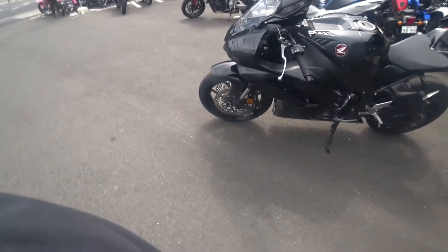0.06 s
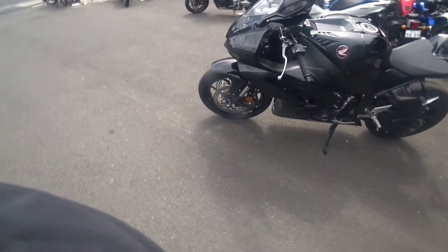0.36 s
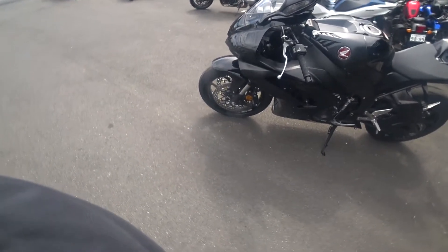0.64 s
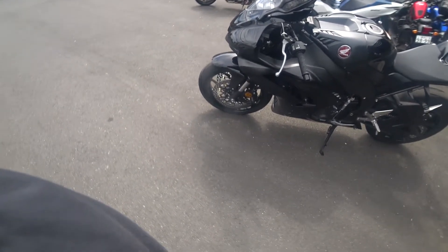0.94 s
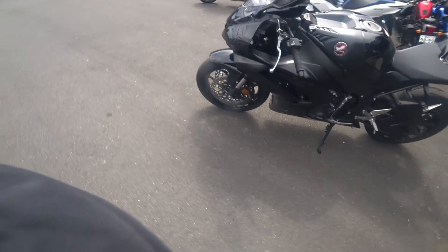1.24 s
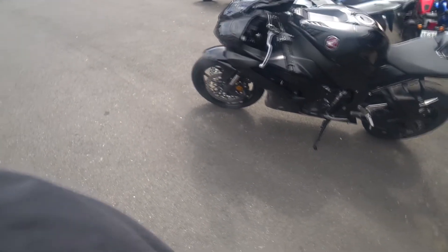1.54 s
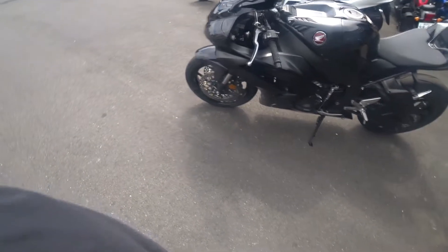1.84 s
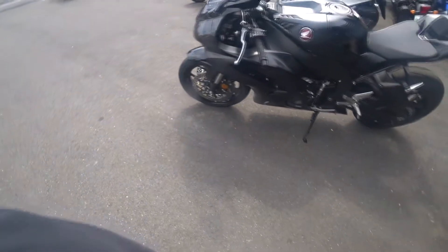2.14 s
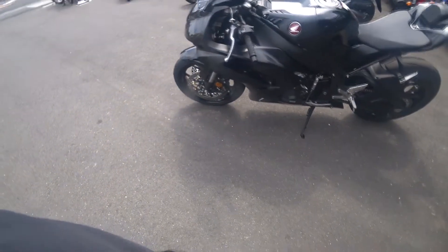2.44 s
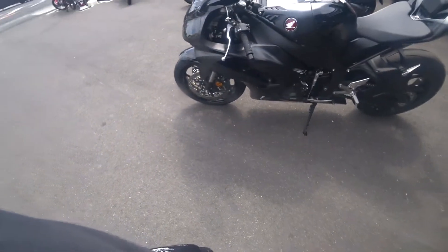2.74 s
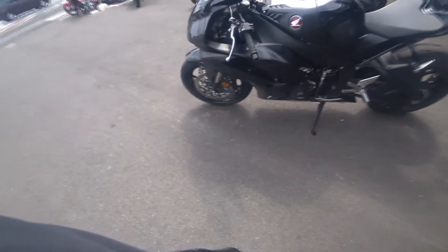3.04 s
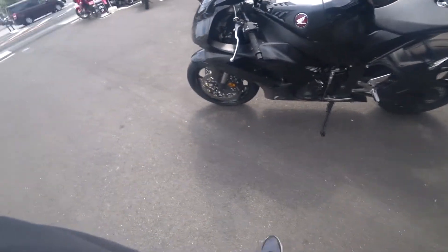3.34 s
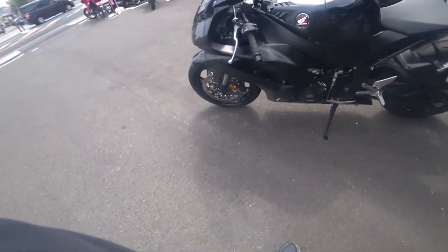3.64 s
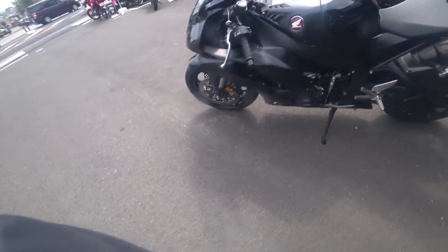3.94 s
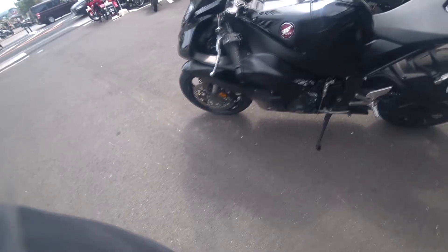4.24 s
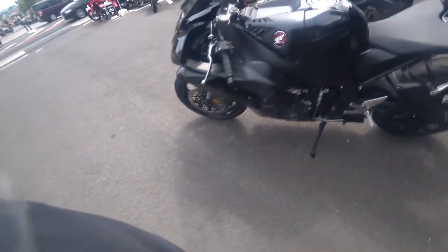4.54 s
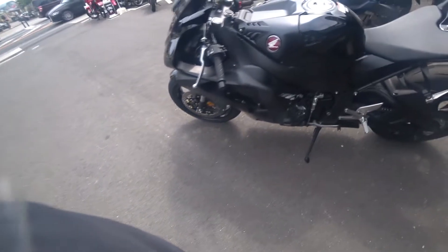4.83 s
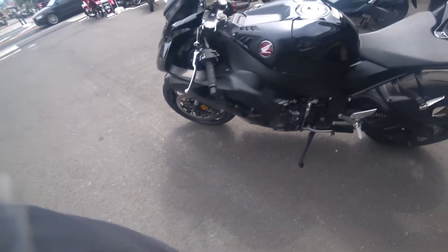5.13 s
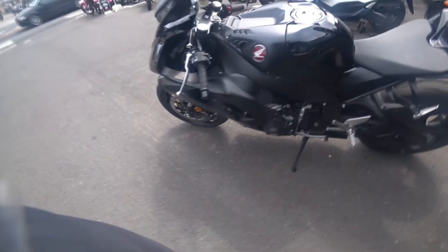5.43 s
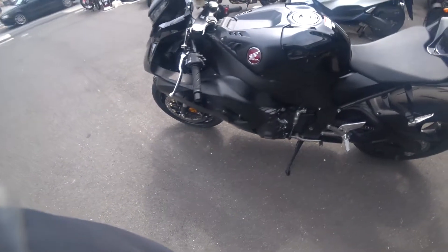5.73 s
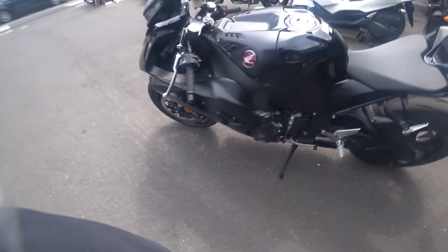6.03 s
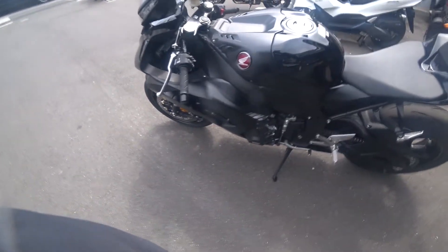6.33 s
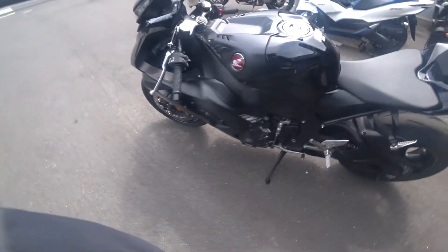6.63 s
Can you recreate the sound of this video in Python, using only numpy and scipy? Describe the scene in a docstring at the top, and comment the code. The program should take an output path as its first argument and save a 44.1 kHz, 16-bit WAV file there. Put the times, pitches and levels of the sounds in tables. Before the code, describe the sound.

A four-cylinder motorcycle idles close by in an open paved lot for the whole seven seconds or so. The main sound is a deep, booming exhaust drone with a fast, soft burble and breathy puffs of gas. A faint mechanical whirr with light valve ticking sits above it, and a steady low rumble lies beneath. The idle wavers very slightly, with the burble and whirr swelling a little at each small rise, but the engine never revs. The tailpipe adds brief, mild throaty growls at about 1.2, 2 and 3.7 seconds, the last one weaker. A very soft high hiss is present from the start until about 1.7 seconds, and returns in short, faint wisps near 3.2 and 5 seconds. The sound is dry and stays at nearly the same loudness to the end.

```python
"""An open paved lot: a four-cylinder motorcycle idles close by, its speed hunting a little.
The silencer booms on the first three firing orders; each exhaust pulse adds a burble and a puff of gas.
When the engine picks up, the main boom thins while burble, gas and mechanical whirr swell.
A low rumble lies underneath, a few soft hisses pass, and now and then the tailpipe growls."""
import sys
import numpy as np
from scipy import signal
from scipy.fft import rfft, irfft, next_fast_len
from scipy.io import wavfile

SR = 44100
rng = np.random.default_rng(int(sys.argv[2]) if len(sys.argv) > 2 else 0)


def master_out(mix):
    """Clip the mix to full scale and print it as 16-bit PCM to the path in sys.argv[1]."""
    frames = np.transpose(np.atleast_2d(mix))
    ceiling = np.clip(frames, -1, 1)
    pcm = np.round(ceiling * 32767).astype(np.int16)
    wavfile.write(sys.argv[1], SR, pcm)


N = 303408

# The pulse strength of each of the four cylinders in dB, in firing order.
CYLINDER_DB = [0.97, -1.1, 0.34, -0.55]


def from_db(db):
    """Decibels to gain."""
    return 10 ** (np.asarray(db) / 20)


def rms_one(x):
    """Scale to unit power."""
    return x / np.sqrt(np.mean(x ** 2) + 1e-20)


def in_time(rows):
    """An automation curve: (seconds, value) points joined by straight lines."""
    return np.interp(np.arange(N) / SR, *np.transpose(rows))


def drift(rate_hz):
    """A smooth random wobble of unit power, rolling off above `rate_hz`."""
    hz = np.arange(N // 2 + 1) * SR / N
    return rms_one(irfft(rfft(rng.standard_normal(N)) / (1 + (hz / rate_hz) ** 4), N))


def colour(x, points):
    """Minimum-phase EQ through (Hz, dB) points, falling steeply past its ends; unit power out."""
    size = next_fast_len(N + SR // 2)
    size += size % 2
    octave = np.log2(np.maximum(np.arange(size // 2 + 1) * SR / size, 1))
    hz, db = np.transpose(points)
    octaves_outside = np.abs(octave - np.clip(octave, np.log2(hz[0]), np.log2(hz[-1])))
    gain = from_db(np.interp(octave, np.log2(hz), db) - 30 * np.minimum(octaves_outside, 2))
    # Folding the cepstrum onto positive time makes the filter causal.
    cepstrum = irfft(np.log(gain))
    cepstrum[1:size // 2] *= 2
    cepstrum[size // 2 + 1:] = 0
    return rms_one(irfft(rfft(x, size) * np.exp(rfft(cepstrum)))[:N])


def level(curve, surge, swell_db):
    """A layer's fader: its dB curve, raised by `swell_db` for each firing per second above idle."""
    return from_db(in_time(curve) + swell_db * surge)


def gate(start, attack_s, hold_s, release_s):
    """Rises to 1 by `start`, holds, then falls."""
    return np.interp(np.arange(N) / SR - start, [-attack_s, 0, hold_s, hold_s + release_s], [0, 1, 1, 0])


def passings(count):
    """Samples at which a running count reaches the next whole number."""
    return np.flatnonzero(np.diff(np.floor(count)) > 0)


def engine_tones(firing, orders, waver_db, waver_hz):
    """Sines locked to multiples of the firing rate, each wavering in level on its own."""
    tones = [from_db(db + waver_db * drift(waver_hz)) * np.cos(2 * np.pi * (k * firing + rng.random()))
             for k, db in orders]
    return np.sqrt(2) * sum(tones)


def boom(firing, surge, flutter_db, trade_db, putter):
    """Three clean orders from the silencer, the third inverted above its resonance."""
    # How the silencer answers to speed. Each row: firings per second above idle,
    # second order in dB, third order in dB.
    silencer = [(-2.6, -14, -24.5), (-0.17, -14.5, -21), (-0.56, -15, -20.5), (1.7, -17.5, -20.5),
                (2, -20, -18)]
    # The deepest tone at idle speed. Each row: time in seconds, relative level in dB.
    fundamental = [(0.0, -21.6), (0.17, -24.8), (0.36, -21.8), (1.52, -22.7), (1.82, -24.3), (2.28, -22.3),
                   (2.47, -25.3), (4.84, -20.7), (4.94, -29.1), (5.07, -22.4), (5.61, -25.3), (6.5, -23.9),
                   (6.63, -26.5), (6.87, -23.8)]
    surges, *upper_db = np.transpose(silencer)
    first = from_db(-0.4) * level(fundamental, surge, swell_db=0.99)
    second, third = (from_db(np.interp(surge, surges, db)) for db in upper_db)
    trade = from_db(trade_db * drift(5.4))   # uneven burns trade strength between the first two
    tones = np.zeros(N)
    for k, gain in enumerate((first * trade, second / trade, -third), 1):
        tones += gain * from_db(flutter_db * drift(27)) * np.cos(2 * np.pi * k * firing)
    strong_weak = 1 + putter * np.cos(np.pi * firing)
    return np.sqrt(2) * tones * strong_weak


def lope(firing):
    """Unequal cylinders put weak tones between the firing orders, which beat against the boom."""
    # Each row: multiple of the firing rate, level in dB.
    between_orders = [(1.25, -42), (1.749, -44), (2.25, -33), (2.5, -37), (2.748, -46.5), (3.499, -45),
                      (4.5, -49)]
    return engine_tones(firing, between_orders, waver_db=1.5, waver_hz=3.0)


def burble(firing, rough_db, uneven_db):
    """Each exhaust pulse carries overtones and a gulp of turbulence as strong as its own burn."""
    # The pulses' overtones. Each row: multiple of the firing rate, level within the burble in dB.
    overtones = [(4, -8), (5, -7.5), (6, -10.5), (7, -11.5), (8, -12.5), (9, -17), (10, -19), (11, -16.5),
                 (12, -21.5), (13, -17), (17, -26)]
    # The gulps' low-mid body. Each row: frequency in Hz, relative level in dB.
    gulp_eq = [(185, -2), (215, -2.5), (255, 3.5), (295, 0.5), (340, -1.5), (400, -4), (470, -14.5)]
    tones = engine_tones(firing, overtones, waver_db=2.1, waver_hz=3.9)
    pulses = passings(firing)
    burn_db = np.resize(CYLINDER_DB, len(pulses)) + uneven_db * rng.standard_normal(len(pulses))
    strength = np.interp(np.arange(N), pulses, from_db(burn_db))
    gulps = colour(rng.standard_normal(N) * strength, gulp_eq)
    return tones + from_db(rough_db) * gulps


def puffs(firing, throb_db, crank_db, throat_db):
    """Gas noise swells with each firing and each crank turn; the tailpipe's resonance makes it throaty."""
    # The breathy midrange of the gas. Each row: frequency in Hz, relative level in dB.
    gas_eq = [(380, -6.5), (480, -3), (580, -3.5), (750, -3.5), (900, -6), (1350, -11), (1830, -14.5),
              (2050, -22), (2600, -29.5)]
    throat_hz, throat_width_hz = 548, 110
    swell_db = -throb_db * np.cos(2 * np.pi * firing) + crank_db * np.cos(np.pi * firing)
    gas = colour(rng.standard_normal(N) * from_db(swell_db), gas_eq)
    throat = signal.lfilter(*signal.iirpeak(throat_hz, throat_hz / throat_width_hz, fs=SR), gas)
    return gas + from_db(throat_db) * throat


def whirr(firing, throb_db, tick_db, tick_s, tick_spread_db):
    """Chain and gears rustle in step with the camshafts; valves tick as they seat, twice per firing."""
    # The machinery's bright sheen. Each row: frequency in Hz, relative level in dB.
    whirr_eq = [(1500, -9), (2100, -3.5), (2700, -2.5), (3000, -5), (3800, -6), (5300, -11), (6100, -14),
                (6550, -13.5), (7200, -17), (7900, -15.5), (8400, -17.5), (9000, -22.5), (10500, -29.5)]
    seatings = passings(2 * firing)
    impacts = np.zeros(N)
    impacts[seatings] = from_db(tick_db + tick_spread_db * rng.uniform(-1, 1, len(seatings)))
    ticks = signal.lfilter([1], [1, -np.exp(-1 / (tick_s * SR))], impacts + 1e-18)
    cam = np.cos(2 * np.pi * firing / len(CYLINDER_DB))
    rustle = from_db(-throb_db * np.cos(2 * np.pi * firing) + 0.39 * cam + .5 * drift(17))
    return colour(rng.standard_normal(N) * np.hypot(rustle, ticks), whirr_eq)


def ground_bounce(x, lag_s, bounce):
    """The bounce off the paving combs the sound; its lag shifts as the listener sways."""
    late = np.arange(N) - SR * lag_s * (1 + .05 * drift(.5))
    return x + bounce * np.interp(late, np.arange(N), x)


def rumble():
    """A steady bed of low noise."""
    # The bed's bass weight. Each row: frequency in Hz, relative level in dB.
    rumble_eq = [(8, -14.5), (22, -5.5), (33, -1.5), (45, -1), (60, -1.5), (72, -4.5), (98, 3.5),
                 (128, -6.5), (145, -10), (165, -10.5), (195, -17), (300, -24.5)]
    return colour(rng.standard_normal(N), rumble_eq)


def hisses():
    """Each soft hiss opens, sags or lifts slightly while it holds, and shuts."""
    # Each row: time fully open in seconds, attack, hold and release in seconds,
    # level in dB, sag in dB per second.
    cues = [(0.018, .05, 1.14, 0.13, -56, 4), (1.24, 0.13, 0.24, 0.22, -55, -1),
            (3.18, .04, .1, .05, -58.5, 10), (5.045, .01, .15, 0.051, -50.5, 34)]
    # The hiss's treble colour. Each row: frequency in Hz, relative level in dB.
    hiss_eq = [(1800, -19.5), (3000, 4), (5300, -1), (6500, -7), (9000, -17)]
    t = np.arange(N) / SR
    envelope = sum(gate(start, attack, hold, release) * from_db(db - sag * np.maximum(t - start, 0))
                   for start, attack, hold, release, db, sag in cues)
    return envelope * colour(rng.standard_normal(N), hiss_eq)


def growls(firing, order, ramp_s, wobble_rad, waver_db):
    """Now and then the tailpipe catches the overtone nearest its resonance and sings it roughly."""
    # Each row: start in seconds, hold in seconds, level against the gas noise in dB.
    cues = [(1.195, 0.2, -6), (1.97, .16, -5), (3.657, 0.36, -12)]
    envelope = sum(from_db(db) * gate(start, ramp_s, hold, ramp_s) for start, hold, db in cues)
    phase = 2 * np.pi * order * firing + wobble_rad * drift(30)
    return np.sqrt(2) * envelope * from_db(waver_db * drift(30)) * np.cos(phase)


def scene():
    """The crank drives every engine layer; rumble and hisses join them in a mono mix."""
    # The hunting idle. Each row: time in seconds, firings per second.
    speed = [(0.0, 53.5), (0.32, 52.0), (0.44, 53.3), (0.7, 52.1), (0.94, 52.8), (1.14, 52.0), (1.32, 53.0),
             (1.46, 51.1), (1.92, 52.2), (2.04, 53.8), (2.24, 50.8), (2.34, 52.3), (2.72, 50.6),
             (2.82, 51.9), (3.1, 51.9), (3.18, 52.7), (3.44, 51.2), (3.86, 52.8), (4.08, 52.7),
             (4.16, 50.9), (4.28, 51.6), (4.56, 50.0), (4.7, 52.7), (4.8, 51.0), (5.56, 51.5), (5.68, 50.5),
             (5.78, 52.5), (5.94, 50.2), (6.22, 51.1), (6.3, 53.4), (6.5, 51.1), (6.87, 50.3)]
    # The fader ride shared by burble and gas. Each row: time in seconds, relative level in dB.
    gas_ride = [(0, -38), (1.2, -39), (1.75, -37.5), (2.72, -39.5), (3.8, -38), (4.09, -38), (4.2, -40),
                (4.65, -40), (4.8, -40), (6.87, -39)]
    firing_hz, idle_hz = in_time(speed), 51.7
    surge = firing_hz - idle_hz
    firing = np.cumsum(firing_hz * (1 + .002 * drift(14))) / SR   # running count of firings

    burble_gain = from_db(4.0) * level(gas_ride, surge, swell_db=1.3)
    gas_gain = from_db(2.5) * level(gas_ride, surge, swell_db=0.84)
    whirr_gain = from_db(-51 + 1.1 * surge)

    exhaust = boom(firing, surge, flutter_db=0.25, trade_db=0.56, putter=.06) + lope(firing)
    exhaust += burble_gain * burble(firing, rough_db=-3.5, uneven_db=1.5)
    tailpipe = puffs(firing, throb_db=1.4, crank_db=0.48, throat_db=-17.5 + 3.3 * surge)
    tailpipe += growls(firing, order=11, ramp_s=.03, wobble_rad=1.1, waver_db=1)
    machinery = whirr(firing, throb_db=0.56, tick_db=-3.5, tick_s=.0012, tick_spread_db=6.5)
    bed = from_db(-29.5) * rumble()
    gas_and_whirr = ground_bounce(gas_gain * tailpipe + whirr_gain * machinery, lag_s=.0035, bounce=0.15)
    return (exhaust + gas_and_whirr + bed + hisses())[None]


def record(dry):
    """A steep low-pass takes off the top."""
    cutoff_hz = 10800
    return signal.sosfilt(signal.ellip(10, .1, 80, cutoff_hz, fs=SR, output="sos"), dry)


dry = scene()
out = record(dry)
master_out(out)
```